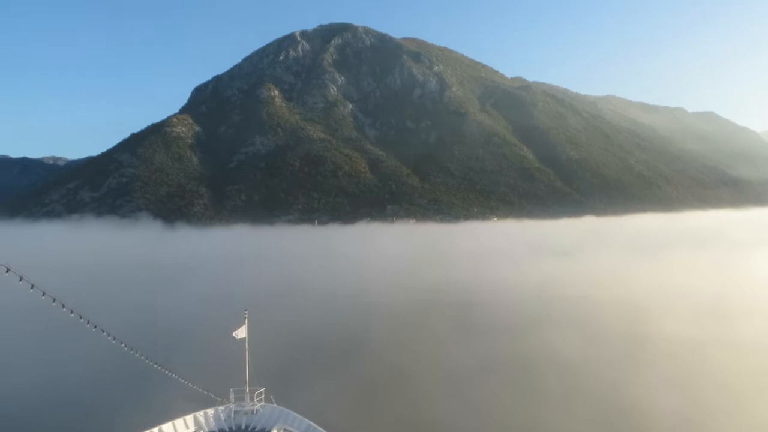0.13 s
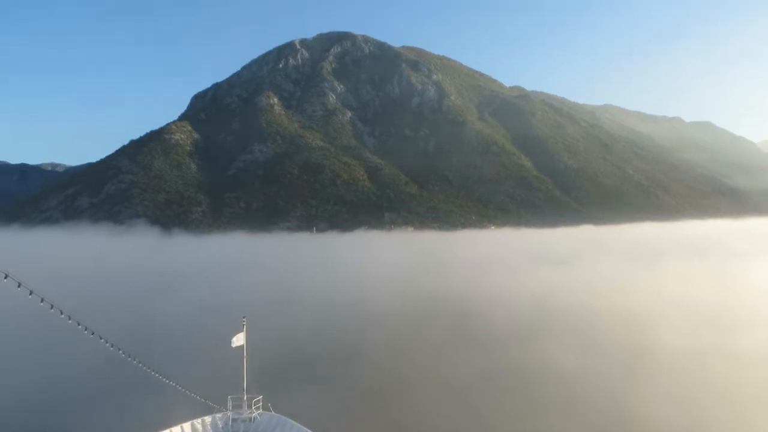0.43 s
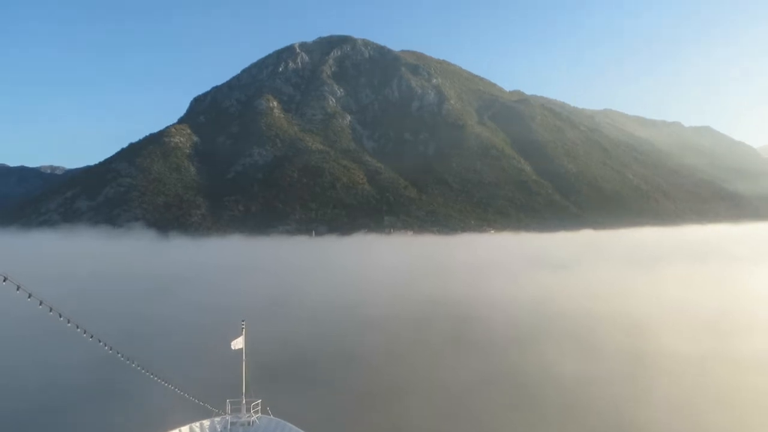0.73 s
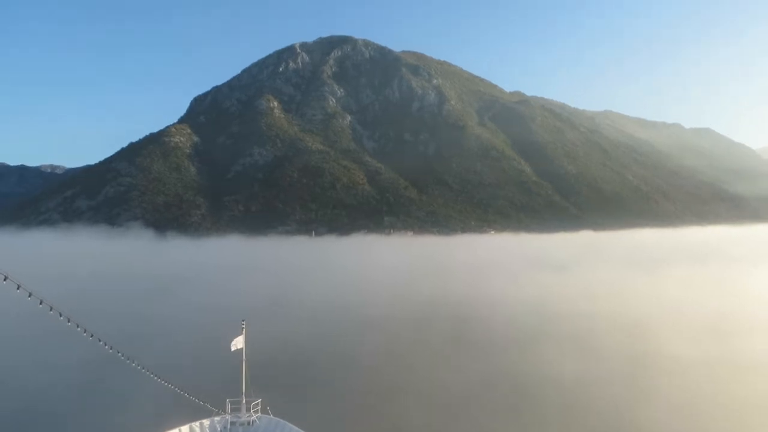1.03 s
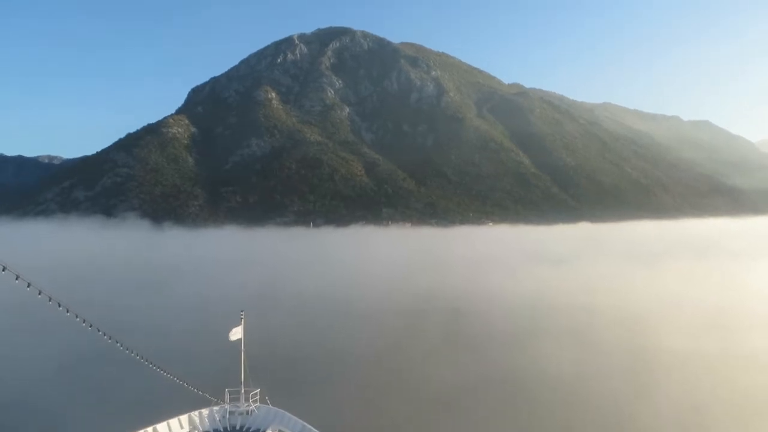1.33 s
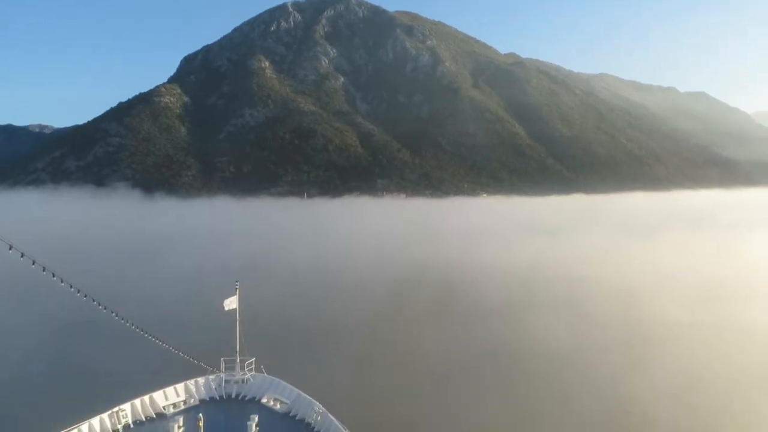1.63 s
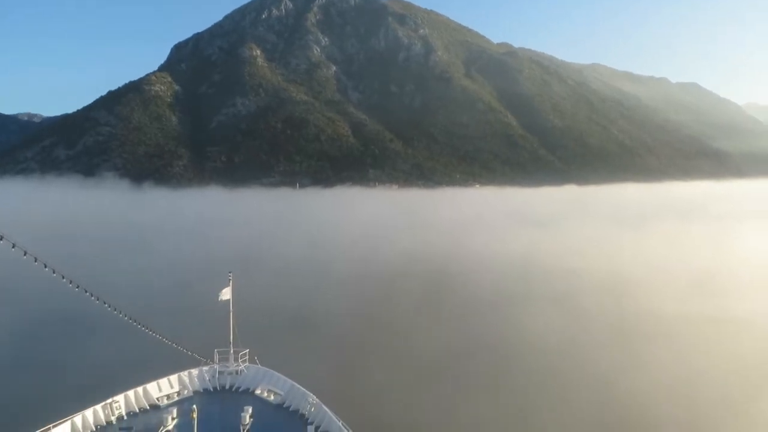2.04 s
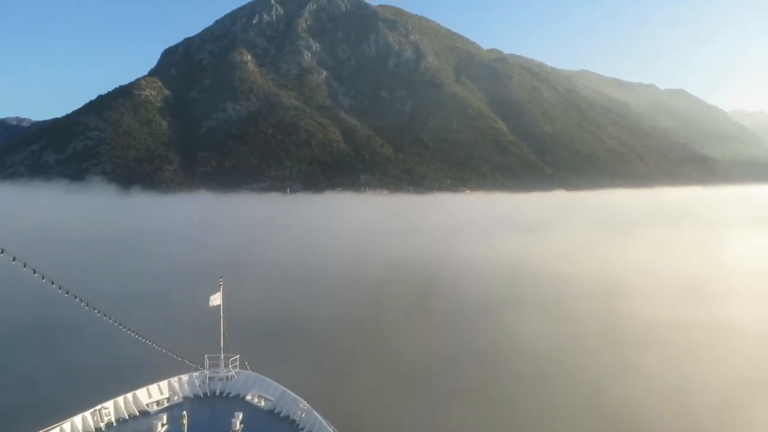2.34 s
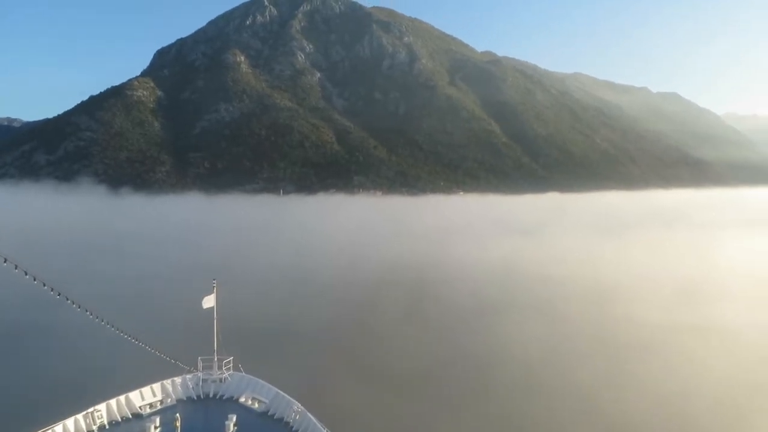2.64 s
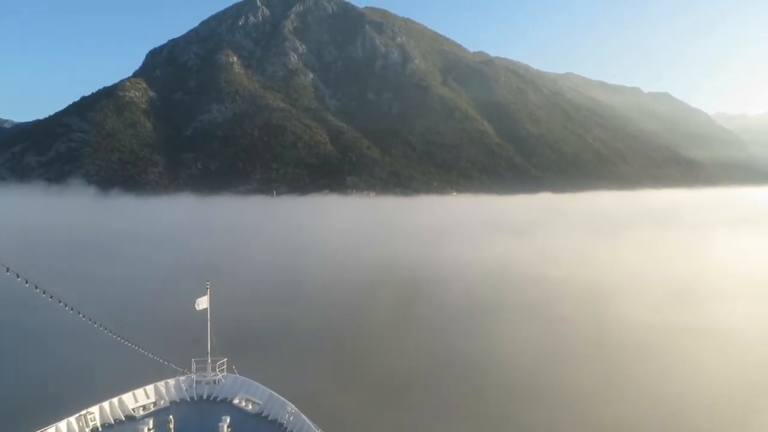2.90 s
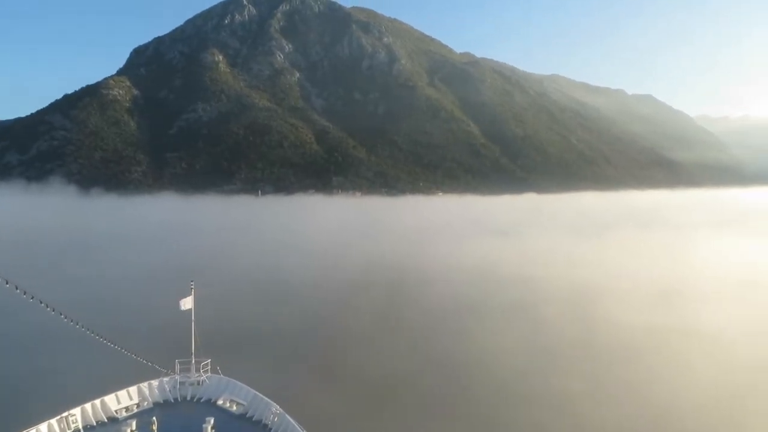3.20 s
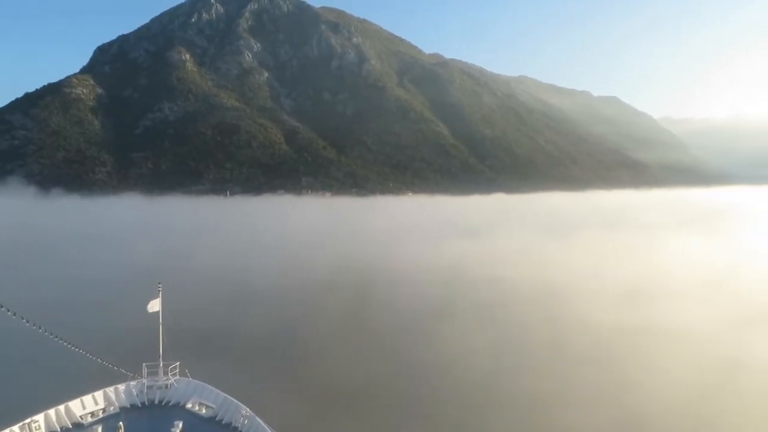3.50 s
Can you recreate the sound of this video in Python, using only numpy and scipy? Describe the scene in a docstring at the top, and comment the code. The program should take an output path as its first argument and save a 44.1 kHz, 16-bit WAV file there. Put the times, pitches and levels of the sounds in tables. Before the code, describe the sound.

A ship's horn starts abruptly at about 0.1 seconds and holds one deep, loud, buzzy note through to the end, around 3.6 seconds. It is close and slightly distorted, with a steady pitch and overtones that shimmer and shift a little. At about 0.3 seconds the bass thins slightly. Light, uneven gusts of wind buffet the microphone on the open deck, well below the horn.

```python
"""A ship's air horn holds one blast near 126 Hz over calm water, heard from a breezy deck close by.
One steep front per cycle arrives directly and off steel walls, over paths that creep as the
hand-held microphone turns; rails scatter the treble. Horn and wind on the two microphone ports
overload the input stage. Soon after the start a wind filter thins the bass."""
import sys
import numpy as np
from scipy import signal
from scipy.fft import rfft, irfft
from scipy.io import wavfile
from scipy.ndimage import uniform_filter1d, map_coordinates

SR = 44100
rng = np.random.default_rng(int(sys.argv[2]) if len(sys.argv) > 2 else 0)


def to_wav(s):
    """Save 16-bit WAV."""
    ch = np.atleast_2d(s).T  # columns
    pcm = np.round(np.clip(ch, -1, 1) * 32767)  # PCM
    wavfile.write(sys.argv[1], SR, pcm.astype(np.int16))


N = 161406

# Horn fundamental: t/s, f/Hz
HORN_PITCH = [(0.1, 124.2), (1.31, 126.3), (1.38, 125.9), (1.74, 125.7), (2.19, 125.8), (2.28, 125.1),
              (2.47, 125.8), (3.05, 126.1), (3.11, 126), (3.23, 126.8), (3.65, 125.3)]
# Spectrum of one front: harmonic number, relative level/dB
HORN_PARTIALS = [(1, 9), (2, 2), (3, -3.5), (4, -0.5), (5, -7.5), (6, -13), (7, -19), (8, -19), (10, -27),
                 (14, -27.5), (20, -28), (27, -30.5), (34, -46.5), (45, -38), (65, -49.5), (90, -63)]
# Drift of harmonic 2: t/s, gain/dB
DRIFT_2 = [(.1, -.5), (.7, -.3), (1.3, -2.5), (1.9, -1.5), (2.5, -2.5), (3.0, -.5), (3.35, 1.5),
           (3.65, -1.5)]
# Drift of harmonics 5 and 7: t/s, gain of 5/dB, gain of 7/dB
DRIFT_5_7 = [(.1, 2, 1), (.5, -1.5, -.5), (.75, -10, -8), (1.15, -6, -0.7), (1.55, -3.5, -1.2),
             (1.9, 1.5, 2), (2.2, 0.5, 1), (2.35, 6.5, 5.5), (2.6, 1, 0), (3.1, 0, 0.5), (3.35, 0.8, 6.5),
             (3.65, 1.5, 4)]
# Wall echoes: delay/ms, creep/(ms per turn unit), gain/dB, change/(dB per turn unit), left-right/dB
WALL_ECHOES = [(2.5, 0.062, -7, 1.48, 2), (4.6, 0.19, -0.26, -0.45, 1.2), (5.4, 0.23, -8.5, -3, 0.6),
               (6.9, -0.022, -4.5, -4, 2.96)]
# Microphone heading: t/s, turn/arbitrary units
MIC_TURN = [(.1, -1.3), (.4, -1.36), (.65, -0.95), (.9, -1.1), (1.2, -0.48), (1.5, -0.59), (1.8, 0.67),
            (2.05, 0.43), (2.22, 0.16), (2.35, 0.38), (2.55, 0.63), (2.85, 0.95), (3.15, 1.3), (3.35, 1.2),
            (3.65, 0.97)]
# Gust envelope: t/s, relative level/dB
GUST_LEVELS = [(0.29, -22.5), (0.4, -24), (0.46, -20.5), (0.54, -29), (0.69, -20), (0.71, -31),
               (0.76, -23.5), (0.9, -33), (0.94, -28.5), (1.0, -32), (1.09, -23), (1.2, -27.5), (1.23, -26),
               (1.35, -32), (1.41, -22), (1.55, -45), (1.65, -24), (1.91, -44), (2.08, -23), (2.12, -34),
               (2.26, -22), (2.48, -29), (2.58, -26.5), (2.91, -28.5), (3.09, -27), (3.21, -29),
               (3.27, -25.5), (3.57, -45)]
# Wind spectrum: f/Hz, relative density/dB
WIND_SPECTRUM = [(20, -15), (60, -6), (150, -8.5), (300, -12), (600, -15), (1200, -24.5), (3000, -34.5),
                 (8000, -34)]

CLIP_LEVEL = 0.36  # overload ceiling, reached near a dry amplitude of 1


def air_horn(t, gain_db=-2, waver=0.0013, drop_lead_ms=0.6644, drop_share=0.59):
    """Harmonics rise in phase into one steep front per cycle; a pressure drop runs just ahead."""
    pitch_hz = curve(HORN_PITCH, t)
    cycles = np.cumsum(pitch_hz * (1 + waver * walk(9.2))) / SR
    harmonics = np.arange(1, 91)
    amplitudes = log_spectrum(HORN_PARTIALS, harmonics)
    grid = np.arange(4096) / 4096
    period = amplitudes @ np.sin(2 * np.pi * np.outer(harmonics, grid))
    drift_db = {2: curve(DRIFT_2, t), 5: curve(DRIFT_5_7, t), 7: curve(DRIFT_5_7, t, column=2)}

    def front(phase):
        wave = np.interp(phase % 1, grid, period, period=1)
        for n, db in drift_db.items():
            wave += amplitudes[n - 1] * (undb(db) - 1) * np.sin(2 * np.pi * n * phase)
        return wave

    drop = drop_share * front(cycles + drop_lead_ms * pitch_hz / 1000)
    return undb(gain_db) * (front(cycles) - drop)


def jet_hiss(gain_db=-33, low_cut_hz=3480):
    """Steady hiss of the horn's air jet."""
    return undb(gain_db) * butter(rng.standard_normal(N), low_cut_hz, "high")


def deck_paths(blast, t, port_lag_ms=0.018, wall_hz=1660, wander_ms=0.015, wander_db=0.2):
    """Direct sound plus dull steel-wall echoes at both ports; the echoes shift with the turn."""
    dull = butter(blast, wall_hz, "low")
    turn = curve(MIC_TURN, t)
    ports = np.array([blast, delay(blast, port_lag_ms)])
    for base_ms, creep_ms, base_db, change_db, pan_db in WALL_ECHOES:
        path_ms = base_ms + creep_ms * turn + wander_ms * walk(4.26)
        gain_db = base_db + change_db * turn + wander_db * walk(4.95)
        ports[0] += undb(gain_db + pan_db / 2) * delay(dull, path_ms)
        ports[1] += undb(gain_db - pan_db / 2) * delay(dull, path_ms + port_lag_ms)
    return ports


def rail_scatter(blast, count=8, echo_db=-12.5, spread_ms=60, wander_ms=0.046, max_lag_ms=0.031):
    """Rails and fittings return the treble over shifting paths, so the overtones shimmer."""
    bright = butter(blast, hz=1420, kind="high")
    ports = np.zeros((2, N))
    for distance, side in rng.random((count, 2)):
        echo = delay(bright, 1 + spread_ms * distance + wander_ms * walk(3))
        ports += undb(echo_db) * np.array([echo, delay(echo, side * max_lag_ms)])
    return ports


def wind(t, gust_gain_db=1.5, breeze_db=-24.5, buffet_db=2.5, mid_db=-6.5, calm_db=-5, calm_end_s=0.22):
    """Low turbulence buffets the ports, more in opposition than together; lighter at first."""
    hz = np.maximum(np.fft.rfftfreq(N, 1 / SR), 1)
    noise = irfft(rfft(rng.standard_normal((2, N))) * log_spectrum(WIND_SPECTRUM, hz), N)
    buffet = undb([buffet_db * walk(39.62) for _ in range(2)])
    mid, side = noise / noise.std() * buffet
    mid *= undb(mid_db)
    calm = undb(calm_db * np.clip((calm_end_s - t) / 0.05, 0, 1))
    strength = np.hypot(undb(curve(GUST_LEVELS, t) + gust_gain_db), undb(breeze_db))
    return np.array([mid + side, mid - side]) * calm * strength / CLIP_LEVEL


def overload(x, knee=15, coupling_hz=45):
    """The input stage flattens the peaks; AC coupling tilts them."""
    flat = CLIP_LEVEL * x / (1 + np.abs(x) ** knee) ** (1 / knee)
    return butter(flat, coupling_hz, "high")


def wind_filter(x, t, on_s=0.281, fade_s=0.0037, low_cut_hz=125, gain_db=-0.5):
    """A bass cut switches in at a set time."""
    mix = np.clip((t - on_s) / fade_s, 0, 1)
    return (1 - mix) * x + mix * undb(gain_db) * butter(x, low_cut_hz, "high")


def undb(db):
    return 10 ** (np.asarray(db) / 20)


def curve(table, t, column=1):
    rows = np.array(table, float)
    return np.interp(t, rows[:, 0], rows[:, column])


def log_spectrum(table, x):
    """Amplitudes from a dB table, interpolated over log x."""
    points, db = np.array(table, float).T
    return undb(np.interp(np.log(x), np.log(points), db))


def walk(rate_hz):
    """Random steps, smoothed twice; spread near 1."""
    hold = int(SR / rate_hz)
    steps = np.repeat(rng.standard_normal(N // hold + 1), hold)
    return 1.49 * uniform_filter1d(uniform_filter1d(steps, hold), hold)[:N]


def butter(x, hz, kind, order=1):
    return signal.lfilter(*signal.butter(order, hz, kind, fs=SR), x)


def delay(x, ms):
    return map_coordinates(x, [np.arange(N) - ms * SR / 1000], order=1, mode="nearest")


def scene():
    """Horn, echoes and wind at the two ports."""
    t = np.arange(N) / SR
    blast = air_horn(t) + jet_hiss()
    return deck_paths(blast, t) + rail_scatter(blast) + wind(t)


def record(dry):
    """Overload, wind filter, treble roll-off and an abrupt start out of silence."""
    start_s, attack_s = 0.0822, 0.0004
    mic_hz, mic_top_hz, band_limit_hz = 8000, 10950, 13300
    t = np.arange(N) / SR
    x = wind_filter(overload(dry), t)
    x = butter(x, mic_hz, "low")
    x = butter(x, mic_top_hz, "low", order=6)
    x *= np.clip((t - start_s) / attack_s, 0, 1)
    return signal.sosfilt(signal.ellip(8, 0.2, 70, band_limit_hz, fs=SR, output="sos"), x)


dry = scene()
out = record(dry)
to_wav(out)
```